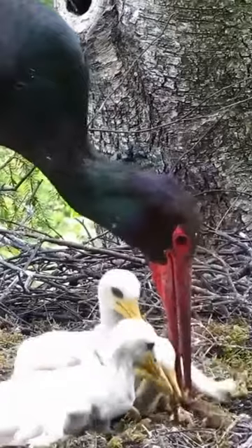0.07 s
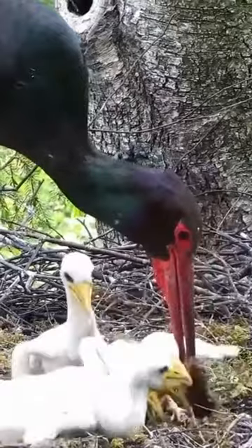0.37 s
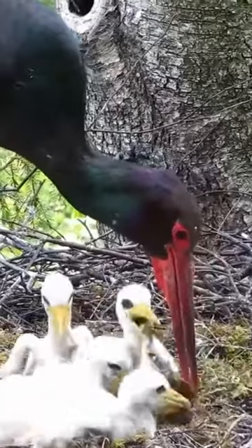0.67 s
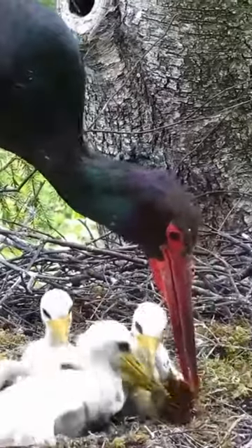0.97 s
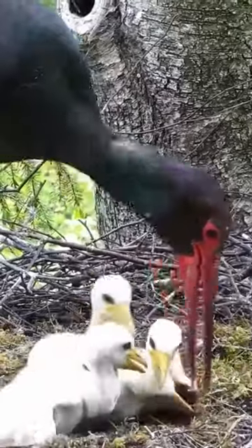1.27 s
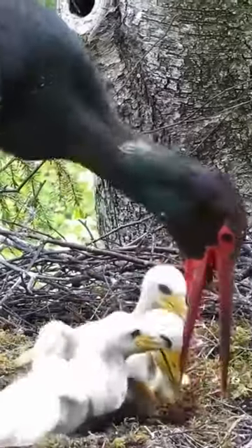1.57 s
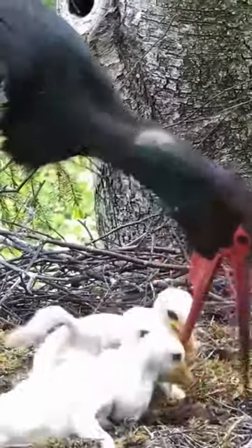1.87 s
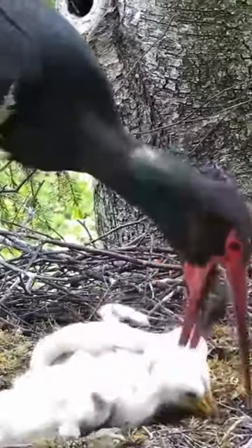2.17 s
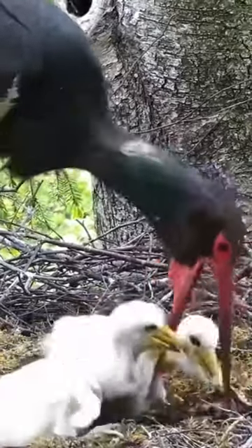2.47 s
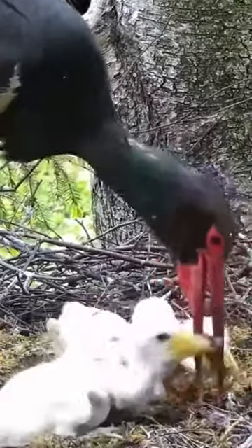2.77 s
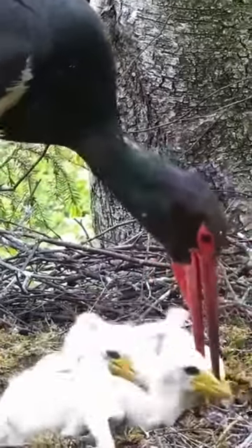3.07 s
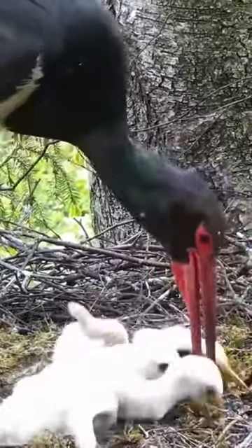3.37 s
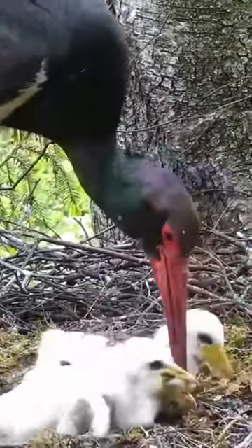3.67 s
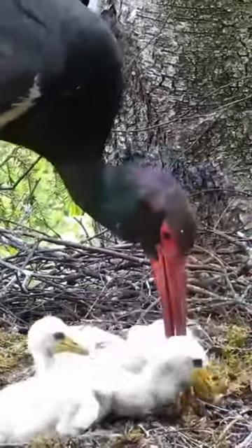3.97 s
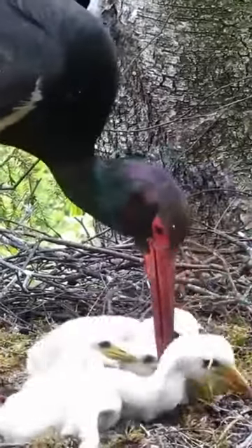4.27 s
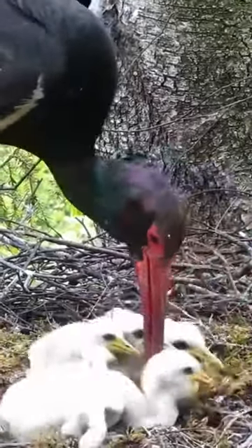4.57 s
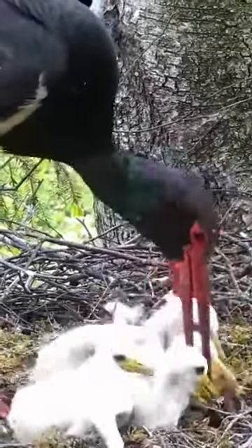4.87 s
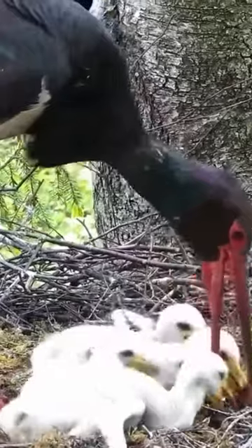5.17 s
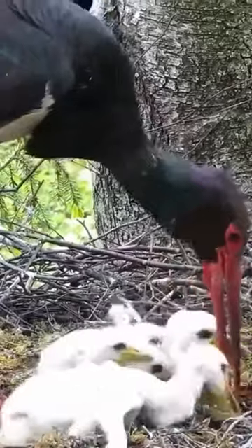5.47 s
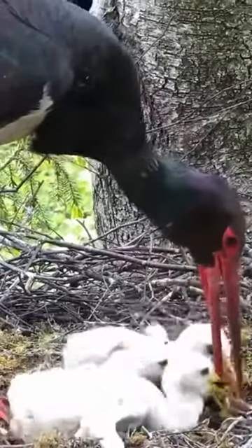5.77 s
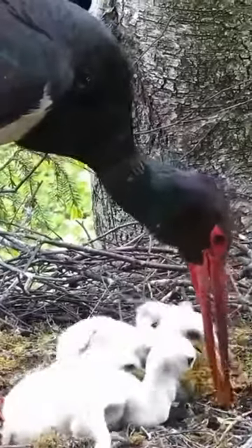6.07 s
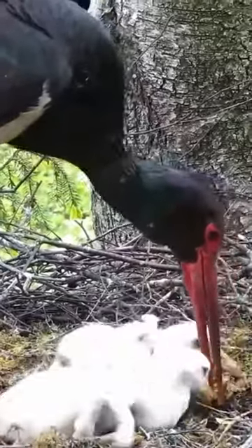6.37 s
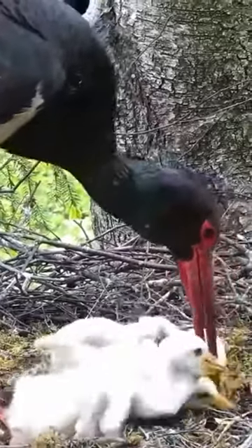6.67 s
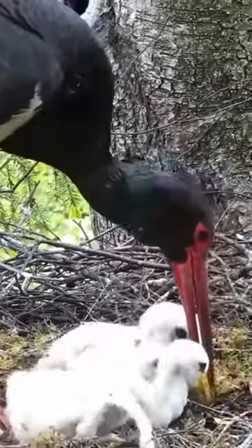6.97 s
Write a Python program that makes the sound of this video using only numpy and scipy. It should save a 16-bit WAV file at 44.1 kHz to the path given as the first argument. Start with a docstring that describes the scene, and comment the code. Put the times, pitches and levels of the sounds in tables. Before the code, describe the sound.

Stork chicks beg in a tree nest, close to the microphone, from the start to the end at about 7 seconds. Their calls are very short and come several times a second in an uneven jumble: creaky, throaty grunts, thin shaky squeals, tiny hoarse squeaks and breathy rasps. They are busiest during the first 3 seconds, with one sharper squeak at about 2.5 seconds, then grow sparser and a little softer, especially after 6 seconds. Farther off, softened by the echo of the forest, single plain whistles sound at about 1.8, 3.8, 6.1 and 7 seconds. From 3.9 to 5.6 seconds a small songbird repeats a high-low two-note phrase five times. At about 6 seconds another distant bird gives a few faint, very high upward flicks that speed into an even trill, sinking slightly at the end. A soft, low outdoor rumble with faint hiss continues underneath.

```python
"""Short creaky grunts, shaky squeals and a throaty rasp: black stork chicks beg at a tree nest, close to
the microphone. A slack membrane pulses to ring the throat, the syrinx whistles, air spurts from the beak.
Further off in the forest, birds whistle, a tit sings two notes and a warbler speeds up into a trill,
all pure tones scattered by the trees. Low outdoor rumble and a nest camera's thin whine lie underneath."""
import sys
import numpy as np
from scipy import signal
from scipy.fft import rfft, irfft
from scipy.io import wavfile
from scipy.ndimage import uniform_filter1d, map_coordinates

SR = 44100
rng = np.random.default_rng(int(sys.argv[2]) if len(sys.argv) > 2 else 0)


def wrap_up_sound(samples):
    """Save the sound to the file named by the first command line argument, as 16-bit audio."""
    columns = np.atleast_2d(samples).T
    # keep every value between -1 and 1, then stretch to whole-number steps
    tamed = np.clip(columns, -1, 1)
    steps = np.round(tamed * 32767).astype(np.int16)
    wavfile.write(sys.argv[1], SR, steps)


N = 314433


def chicks():
    """The brood, close to the microphone; the wider the beak, the more air rasps around each grunt."""
    # throat calls: start_s, length_s, throat_hz, level_db
    grunts = [(.108, 0.033, 502, -55), (.18, 0.061, 480, -54), (.303, 0.03, 472, -49.5),
              (0.404, .033, 443, -46.5), (0.447, 0.021, 398, -50), (.525, .027, 401, -47),
              (0.57, 0.032, 410, -54), (0.635, 0.044, 399.3, -47.5), (0.762, 0.066, 397.4, -50.5),
              (0.833, 0.058, 479, -58), (1.033, 0.027, 596, -51.5), (1.09, 0.036, 441.4, -54),
              (1.143, .04, 562, -57), (1.214, 0.011, 482, -52), (1.325, 0.013, 490, -51.5),
              (1.375, 0.062, 473, -55), (1.446, 0.022, 452, -50), (1.508, 0.018, 426, -48.5),
              (1.567, 0.034, 423, -50), (1.604, 0.044, 398, -49.5), (1.656, 0.046, 411.5, -55.5),
              (1.725, 0.037, 414, -52), (1.89, 0.047, 500, -52.5), (1.969, 0.038, 509, -50.5),
              (2.089, 0.046, 588, -56.5), (2.225, .027, 414, -47.5), (2.462, 0.039, 431, -47),
              (2.502, 0.054, 456.6, -49.5), (2.566, 0.059, 527.6, -50.5), (2.692, .05, 498, -60.5),
              (2.877, 0.049, 490, -52.5), (2.995, 0.042, 496, -50.5), (3.124, 0.034, 500, -50.5),
              (3.238, 0.079, 432, -52), (3.32, .012, 624, -52), (3.417, 0.046, 622, -54.5),
              (3.523, 0.027, 573, -54), (3.573, .032, 428, -53.5), (3.665, 0.027, 446, -49.5),
              (3.911, 0.026, 420, -53.5), (4.002, 0.029, 452, -49.5), (4.107, 0.011, 600, -53.5),
              (4.135, 0.055, 388, -56.5), (4.188, 0.014, 387, -50), (4.323, 0.0566, 623, -57),
              (4.437, 0.024, 475.5, -51), (4.464, 0.034, 568, -54), (4.55, 0.015, 424, -48.5),
              (4.583, 0.031, 432, -54.5), (4.644, 0.017, 526, -49.5), (4.754, .026, 531, -53),
              (4.861, 0.039, 458, -47.5), (4.944, 0.035, 432, -54.5), (5.299, .02, 493, -48.5),
              (5.319, .053, 560, -51), (5.44, 0.066, 486.6, -53), (5.61, 0.047, 424.7, -46.5),
              (5.736, .027, 537, -51.5), (5.861, 0.043, 455, -48.5), (6.057, 0.03, 554, -56),
              (6.3, 0.019, 468, -54.5), (6.401, .025, 470, -50), (6.689, 0.019, 407, -52),
              (6.799, 0.046, 407, -50.5), (6.943, 0.09, 443, -59)]
    # syrinx calls: start_s, length_s, pitch_hz, glide_hz, level_db, roughness
    squeals = [(.085, 0.0067, 3010, 102, -50, 0.33), (0.144, .024, 3320, 700, -58.5, 0.46),
               (0.206, 0.015, 2690, 600, -47.5, 1.05), (0.209, 0.03, 3560, -300, -56.5, 0.78),
               (.285, 0.018, 3560, 300, -50.5, 0.6), (0.308, 0.045, 3470, -200, -50.5, 0.77),
               (0.385, 0.0096, 4050, 700, -52, 0.8), (0.426, 0.018, 3470, -300, -51.5, 0.56),
               (0.463, .021, 3430, 902, -48, 0.23), (0.493, 0.034, 3770, 500, -51, .45),
               (.553, 0.058, 3300, -200, -57.5, 1.02), (0.618, 0.015, 3520, -200, -52.5, 0.4),
               (.626, 0.065, 2200, 195, -54.5, 0.18), (0.702, 0.034, 3400, 97, -53.5, 0.43),
               (0.738, 0.019, 2250, 304, -51, 0.98), (.952, .056, 4700, 1700, -67, .45),
               (1.018, .014, 3120, -500, -49.5, 0.55), (1.092, 0.038, 2720, -500, -51.5, 0.52),
               (1.131, 0.022, 3450, 300, -54.5, 0.4), (1.197, 0.063, 3240, 395, -52, 0.8),
               (1.302, 0.042, 3470, 406, -51, 0.88), (1.315, 0.032, 2350, 300, -55, 0.38),
               (1.358, 0.051, 3450, -500, -54, 0.57), (1.412, 0.034, 3416, -100, -47, .15),
               (1.427, 0.044, 2350, -100, -53, .55), (1.461, .07, 3610, -300, -56, 0.82),
               (1.54, 0.039, 3570, 400, -52, 0.43), (1.592, 0.058, 3540, -500, -53, 0.75),
               (1.642, .035, 3340, -300, -59, 0.5), (1.715, 0.017, 3430, -500, -53.5, 1.3),
               (1.745, 0.028, 2150, 102, -51, 0.4), (1.834, 0.023, 2746, 1100, -51, 0.87),
               (1.927, 0.0067, 3540, 500, -48.5, 0.08), (2.01, 0.029, 3020, 1189, -53.5, 1.05),
               (2.085, 0.062, 3610, -300, -52.5, 0.32), (2.089, 0.038, 2270, 194, -53, 0.4),
               (2.201, 0.0065, 5200, 400, -53.5, 0.5), (2.277, 0.043, 2310, 197, -51, .35),
               (2.341, 0.057, 3640, -400, -54, 0.58), (2.35, 0.0624, 2325, 203, -50, 0.65),
               (2.405, 0.051, 3210, -400, -53, 0.93), (2.434, 0.061, 2274, 93, -47, 0.29),
               (2.487, 0.024, 2250, -5, -48.5, .3), (2.517, 0.018, 2030, -100, -40, 0),
               (2.546, .021, 3730, -300, -54.5, 0.64), (2.573, .027, 2420, 600, -49, 0.46),
               (2.665, 0.04, 3040, -800, -59, 0.13), (2.896, 0.029, 2170, -200, -53.5, 0.38),
               (3.071, 0.034, 3920, 102, -58, 0.38), (3.093, 0.019, 5040, 200, -58, .75),
               (3.114, 0.016, 2604, -700, -51, 0.9), (3.184, .021, 2360, 0, -48.5, 0.23),
               (3.292, 0.043, 2690, 402, -48.5, 0.79), (3.411, 0.044, 2550, -300, -53, 0.74),
               (3.602, 0.022, 2980, 400, -52, 0), (4.047, .045, 2437, -600, -57.5, 0.5),
               (4.109, 0.031, 3410, 600, -54, 1.34), (4.214, 0.038, 3340, 505, -53, 1.3),
               (4.323, 0.053, 2980, -600, -51.5, 1.05), (4.444, 0.12, 3430, 401, -57.5, 1),
               (4.918, 0.053, 1933, -300, -58, 0.18), (4.994, 0.025, 3440, -200, -53, .4),
               (5.095, 0.0067, 3300, 200, -51, 0.3), (5.201, 0.049, 2950, -600, -52, 0.6),
               (5.314, 0.069, 3010, -400, -50.5, 0.73), (5.395, 0.043, 3780, 500, -56, 0.48),
               (5.948, 0.011, 1830, -100, -52.5, 0.12), (6.049, .034, 1890, -200, -54.5, 0.27),
               (6.132, 0.014, 2990, -500, -56.5, 0.1), (6.427, 0.082, 3650, -55, -53, 0.26),
               (6.577, 0.043, 3600, -200, -59, 0.64), (6.674, .052, 2000, -400, -58, 0.08),
               (6.772, 0.022, 2210, -200, -57, .1), (6.931, 0.094, 1786, -200, -58.5, 0.38)]
    # brightness as the beaks open and close, relative to the throat: time_s, beak_db, rasp_db
    gape = [(.2, -4.5, -22), (.45, -5.5, -11.5), (.8, -5, -31), (1.15, -6, -23), (1.35, -2.5, -10.5),
            (1.72, -3.5, -11.5), (1.95, -6, -26), (2.13, -6, -6.5), (2.6, -4, -29.5), (3.0, -4, -12),
            (3.2, -15.5, -19), (3.6, -7, -28), (4.3, -9.5, -19), (4.6, -11, -19.5), (4.76, -6.5, -13.5),
            (4.9, -14, -31), (5.45, -4, -11.5), (5.9, -11, -35), (6.7, -3.5, -20), (7.0, -10, -28)]
    gape_s, beak_db, rasp_db = np.transpose(gape)
    lead_s, lag_s = .012, .029  # air escapes before and after the voice
    out = chatter() + mutter()
    for start, length, throat_hz, db in grunts:
        add(out, start, grunt(length, throat_hz, db, np.interp(start, gape_s, beak_db)))
        add(out, start - lead_s, rasp(lead_s + length + lag_s, db + np.interp(start, gape_s, rasp_db)))
    for start, length, hz, glide_hz, db, rough in squeals:
        add(out, start, squeal(length, hz - glide_hz / 2, hz + glide_hz / 2, db, rough))
    return forest(out, t60=.47, wet_db=-10, gap_s=.0023)


def grunt(length, throat_hz, db, beak_db):
    """A few membrane pulses ring the throat on their second harmonic, and the neck and beak above it."""
    # resonances of the long neck: centre_hz, width_hz, gain_db
    neck_modes = [(756, 109, -13), (1044, 180, -16)]
    # resonances of the open beak: centre_hz, width_hz, gain_db
    beak_modes = [(1870, 1050, 18), (2320, 510, 11), (3250, 1400, 3)]
    size = int((length + .008) * SR)
    ragged = undb((beak_db + 8.5) / 2)  # brighter calls pulse less evenly
    at, strengths = creak(int(length * SR), throat_hz / 2, .052 * ragged, 1.96 * ragged, sag=.22)
    strengths *= np.interp(at / size, [0, .25, 1], [.65, 1, .55])  # quick swell, then easing off
    age_s = np.maximum(np.arange(size) - at[:, None], 0) / SR
    early = .5 - at[:, None] / size
    stretch = 1 + .093 * rng.standard_normal() + .41 * early  # the neck is held differently in each call
    neck_db = -.55 * (beak_db + 2) + 2 * rng.standard_normal()  # a nearly shut beak lets it ring more
    neck_db += 4 * np.log2(length / .034)  # long croaks fill the neck, short clucks stay in the throat
    width_hz = 164 * (490 / throat_hz) ** 1.26  # a tense throat rings more sharply
    modes = [(throat_hz * (1 + .44 * early), width_hz, 0)]  # sinks as the throat relaxes
    modes += [(hz * stretch, width, gain_db + neck_db) for hz, width, gain_db in neck_modes]
    ringing = sum(undb(gain_db) * np.exp(-np.pi * width * age_s) * np.sin(2 * np.pi * hz * age_s)
                  for hz, width, gain_db in modes)
    throat = uniform_filter1d(strengths @ ringing, 15)  # the membrane closes softly
    throat = signal.sosfilt(signal.butter(3, [295, 1380], "band", fs=SR, output="sos"), throat)
    knocks = level(np.bincount(at, strengths, size), -4)
    breath = level(puffs(size, at, strengths, decay_s=.006) * rng.standard_normal(size))
    beak = cavity(knocks + breath, beak_modes)
    beak = signal.sosfilt(signal.butter(3, [1500, 4300], "band", fs=SR, output="sos"), beak)
    return (level(throat, db) + level(beak, db + beak_db)) * fade(size, .0005, .0039)


def squeal(length, first_hz, last_hz, db, rough, arch_hz=150, octave_db=-22, burst_s=.0051):
    """A thin syrinx whistle; the harder it is forced, the more it shakes and breaks into hoarse spurts."""
    size = int((length + .0052) * SR)
    rough = np.clip(rough, .02, 1.2)
    hz = np.linspace(first_hz, last_hz, size) + (40 + 330 * rough) * wander(size, 200)
    hz += arch_hz * (np.sin(np.linspace(0, np.pi, size)) - 2 / np.pi)  # the pitch arches with the effort
    phase = 2 * np.pi * np.cumsum(hz) / SR
    turbulence = wander(size, 1100) + 1j * wander(size, 1100)  # widens the tone into a band
    hoarse = np.sqrt(.52 * rough)
    tone = np.exp(1j * phase) + rough * undb(octave_db) * np.exp(2j * phase)
    voice = np.real((np.sqrt(2 * (1 - hoarse ** 2)) + hoarse * turbulence) * tone)
    spurts = puffs(size, *creak(size, rate_hz=240, jitter=.22, shimmer_db=2.2), decay_s=.0059)
    push = 1 + 1.2 * rough * np.exp(-np.arange(size) / SR / burst_s)  # forced squeals burst open
    flow = (1 - hoarse + hoarse * spurts) * push * fade(size, .0015, .0077)
    hiss = cavity(rng.standard_normal(size), [((first_hz + last_hz) / 2, 1900, 0)])
    return level(flow * (level(voice) + rough * level(hiss, -12)), db)


def rasp(length, db):
    """Air spurts through the open beak and whistles hoarsely on fixed resonances that wobble a little."""
    # resonances at the beak's edge: centre_hz, width_hz, gain_db
    edge_modes = [(3500, 940, 14.5), (4960, 860, 8.5), (6140, 620, 3), (7560, 1350, 6), (9900, 3100, -3.5)]
    size = int(length * SR)
    spurts = puffs(size, *creak(size, rate_hz=170, jitter=.22, shimmer_db=8), decay_s=.011)
    hiss = np.zeros(size)
    for hz, width_hz, gain_db in edge_modes:
        phase = 2 * np.pi * np.cumsum(hz * (1 + .07 * wander(size, 90))) / SR
        band = wander(size, width_hz) * np.sin(phase) + wander(size, width_hz) * np.cos(phase)
        hiss += undb(gain_db) * band
    return level(spurts * fade(size, .00087, .01) * hiss, db)


def creak(size, rate_hz, jitter, shimmer_db, sag=0):
    """Uneven pulses of a slack membrane, slowing by the share sag: their sample positions and strengths."""
    count = max(int(size / SR * rate_hz * 2), 4)
    timing, force = rng.standard_normal((count, 2)).T
    slowing = 1 + sag * (np.minimum(np.arange(count) * 2 / count, 1) - .5)
    periods_s = np.clip(slowing + jitter * timing, .4, 3) / rate_hz
    at = ((np.cumsum(periods_s) - periods_s[0] + .001) * SR).astype(int)
    return at[at < size], undb(shimmer_db * force[at < size])


def puffs(size, at, strengths, decay_s):
    """Air flow that jumps at each pulse and dies away."""
    pulses = np.bincount(at, strengths, size)
    return level(signal.lfilter([1], [1, -np.exp(-1 / (decay_s * SR))], pulses))


def cavity(x, modes):
    """Steep resonances side by side, with dark valleys between them."""
    out = np.zeros(len(x))
    for hz, width_hz, db in modes:
        peak = signal.iirpeak(hz, hz / width_hz, fs=SR)
        out += undb(db) * signal.lfilter(*peak, signal.lfilter(*peak, x))
    return out


def chatter(count=190):
    """Tiny squeaks in the nest at random moments, low hoarse ones and fainter shrill ones in turn."""
    # loudness of the low squeaks: time_s, level_db
    loudness = [(.1, -66), (.55, -59), (.92, -62), (1.5, -52), (1.9, -60), (2.4, -55.5), (2.8, -71.5),
                (3.1, -57.5), (3.8, -63.5), (4.4, -57), (4.9, -74), (5.5, -56.5), (6.1, -72.5), (6.75, -55),
                (7.1, -78)]
    out = np.zeros(N)
    for k, (when, pitch, glide, length) in enumerate(rng.random((count, 4))):
        start = (k + when) / count * N / SR
        hz, db = (5000 + 3600 * pitch, -12) if k % 2 else (2100 + 1900 * pitch, 0)
        db += np.interp(start, *np.transpose(loudness))
        add(out, start, squeal(.008 + .022 * length, hz, hz * (.9 + .2 * glide), db, rough=1.2))
    return out


def mutter(count=22):
    """Faint grunts from the rest of the brood at random moments, each with its own length and throat."""
    out = np.zeros(N)
    for k, (when, length, tension) in enumerate(rng.random((count, 3))):
        start = (k + when) / count * N / SR
        throat_hz = 500 * 2 ** ((tension - .5) / 2)
        add(out, start, grunt(.04 * (.5 + length), throat_hz, db=-62.5, beak_db=-4))
    return out


def tit(low_delay_s=.173):
    """A see-saw song off among the trees: a rising upper note, then a falling lower one."""
    # two-note phrases: start_s, high_db, low_db
    phrases = [(3.895, -68, -60.5), (4.24, -65, -57.5), (4.585, -64, -59.5), (4.928, -65, -59.5),
               (5.303, -64.5, -53)]
    # course of the upper note: time_s, pitch_hz, swell_db
    high_shape = [(0, 4500, -4), (0.026, 4606, -0.5), (0.061, 4833, 7.5), (.077, 5050, 8.5),
                  (0.088, 6100, -9)]
    # course of the lower note: time_s, pitch_hz, swell_db
    low_shape = [(0, 4018, 0.5), (.015, 3843, -0.5), (0.043, 3700, 4.5), (.075, 3550, -15)]
    out = np.zeros(N)
    for start, high_db, low_db in phrases:
        add(out, start, note(high_shape, high_db))
        add(out, start + low_delay_s, note(low_shape, low_db))
    return forest(out, t60=.82, wet_db=-.5, gap_s=.0016)


def warbler(trill_start_s=6.288, period_s=.063, count=14):
    """Distant upward flicks, first single and then in an even trill, more scatter than direct sound."""
    # single flicks ahead of the trill: start_s
    lead_in = [5.969, 6.086, 6.196]
    # course of the song, swelling and sinking in pitch at the end: time_s, top_hz, level_db
    song = [(6.08, 8560, -72), (6.19, 7610, -66), (6.3, 7980, -70.5), (6.68, 7900, -66),
            (6.92, 7450, -63.5), (7.1, 6640, -63)]
    # one flick: time_s, ratio_to_top_pitch, swell_db
    flick = [(-.008, .64, -14), (.005, .73, -2), (.015, .83, 5), (.022, .94, 3.5), (.028, 1.065, -18)]
    time_s, top_hz, db = np.transpose(song)
    out = np.zeros(N)
    for start in [*lead_in, *(trill_start_s + period_s * np.arange(count))]:
        tone = note(flick, np.interp(start, time_s, db), pitch=np.interp(start, time_s, top_hz))
        add(out, start + flick[0][0], tone)
    return forest(out, t60=.92, wet_db=5.5, gap_s=.002)


def whistlers():
    """Single plain whistles from deep in the forest."""
    # far whistles: start_s, end_s, first_hz, last_hz, level_db
    whistles = [(1.765, 1.832, 2204, 2150, -61), (3.825, 3.896, 3720, 3780, -58),
                (6.13, 6.22, 1810, 1796, -65.5), (7.019, 7.128, 2220, 2490, -72)]
    out = np.zeros(N)
    for start, end, first_hz, last_hz, db in whistles:
        add(out, start, note([(0, first_hz, 0), (end - start, last_hz, -3)], db, waver=.014))
    return forest(out, t60=.73, wet_db=2, gap_s=.0072)


def note(shape, db, pitch=1, waver=.0078):
    """A songbird's pure tone, wavering slightly as it follows a course of pitch and level."""
    time_s, contour, swell_db = np.transpose(shape)
    t = np.arange(time_s[0], time_s[-1], 1 / SR)
    hz = pitch * np.interp(t, time_s, contour) * (1 + waver * wander(len(t), 159))
    envelope = undb(db + np.interp(t, time_s, swell_db)) * fade(len(t), .00093, .0023)
    return np.sqrt(2) * np.sin(2 * np.pi * np.cumsum(hz) / SR) * envelope


def forest(x, t60, wet_db, gap_s):
    """Direct sound plus a scatter from trunks and crowns that fades by 60 dB in t60 seconds."""
    t = np.arange(SR) / SR
    tail = rng.standard_normal(SR) * undb(-60 * t / t60) * np.clip(t / gap_s - .5, 0, 1)
    return x + undb(wet_db) * signal.fftconvolve(x, tail / np.linalg.norm(tail))[:N]


def air(level_db=-57, sway_db=.5):
    """Low outdoor rumble and soft hiss around the nest, swaying a little."""
    # spectrum of the open air: frequency_hz, relative_db
    spectrum = [(15, -53), (25, -7.5), (75, 4.5), (240, -4), (542, -7.5), (1360, -20), (1970, -10),
                (3070, -21), (3790, -21.5), (4440, -27), (5930, -34.5), (7710, -32), (10000, -38.5),
                (12400, -43), (13400, -41.5)]
    hz, db = np.transpose(spectrum)
    colour = undb(np.interp(np.log(np.fft.rfftfreq(N, 1 / SR) + 1), np.log(hz), db))
    rumble = irfft(rfft(rng.standard_normal(N)) * colour, N)
    return level(rumble, level_db) * undb(sway_db * wander(N, 7.9))


def undb(db):
    """Decibels to gain."""
    return 10 ** (np.asarray(db) / 20)


def level(x, db=0):
    """Scale to an rms level."""
    return x * undb(db) / np.sqrt(np.mean(x ** 2) + 1e-20)


def add(out, start, x):
    """Mix x into out from a start time in seconds."""
    i = max(int(start * SR), 0)
    out[i:i + len(x)] += x[:max(N - i, 0)]


def wander(size, rate):
    """Smooth random motion of spread near 1, through rate random points a second."""
    knots = rng.standard_normal(int(size * rate / SR) + 4)
    return map_coordinates(knots, [1 + np.arange(size) * rate / SR], order=3, mode="nearest")


def fade(size, rise_s, fall_s):
    """Envelope with soft ends."""
    t = np.arange(size) / SR
    return np.sin(np.pi / 2 * np.clip(np.minimum(t / rise_s, (t[-1] - t) / fall_s), 0, 1))


def scene():
    """One microphone at the nest: chicks in front, forest behind."""
    return (chicks() + tit() + warbler() + whistlers() + air())[None]


def record(dry, whine_hz=12000, whine_db=-91, open_s=.082, top_hz=13600):
    """The nest camera adds a thin whine, opens its input just after the start and cuts the top."""
    t = np.arange(N) / SR
    whine = undb(whine_db) * np.sqrt(2) * np.sin(2 * np.pi * whine_hz * t)
    live = (dry + whine) * (t >= open_s)
    return signal.sosfilt(signal.ellip(10, .2, 70, top_hz, fs=SR, output="sos"), live)


dry = scene()
out = record(dry)
wrap_up_sound(out)
```